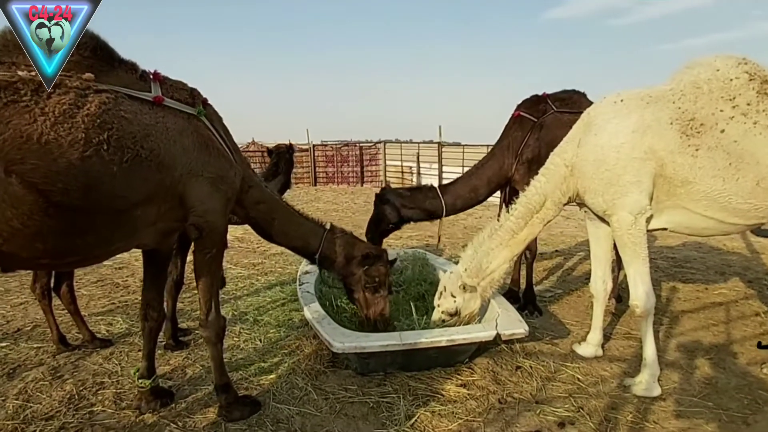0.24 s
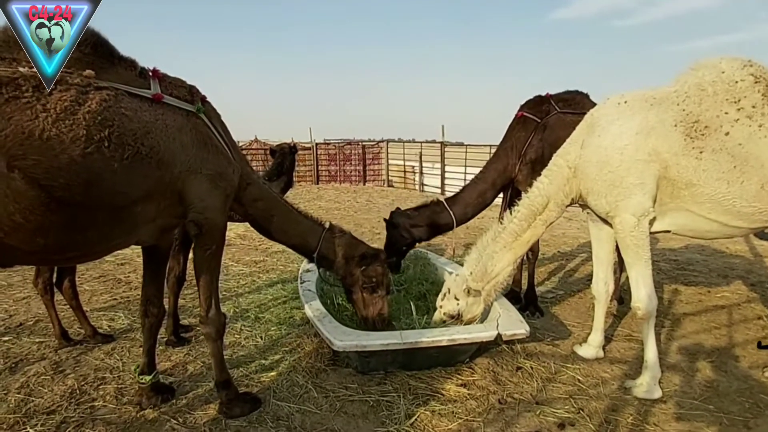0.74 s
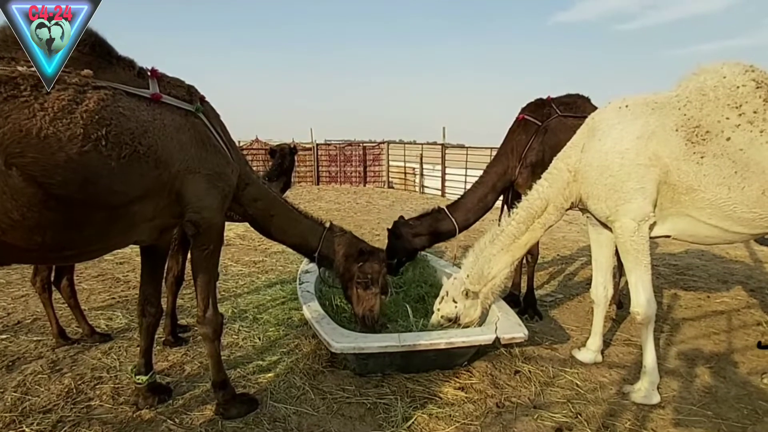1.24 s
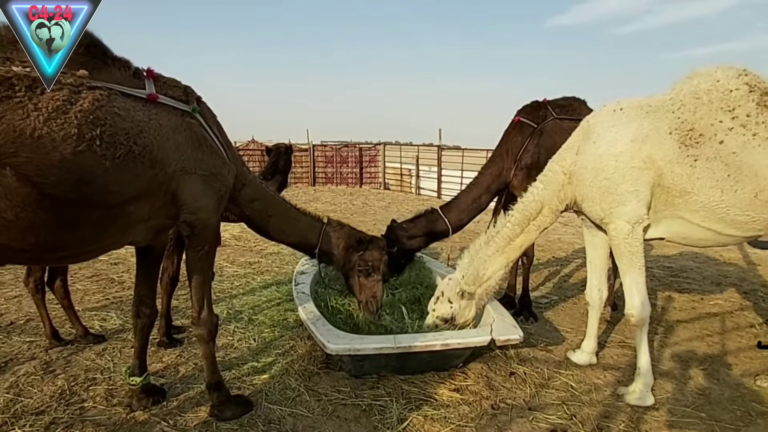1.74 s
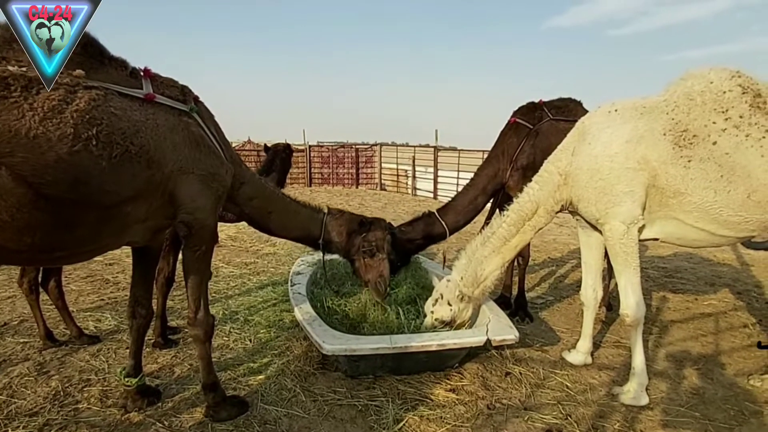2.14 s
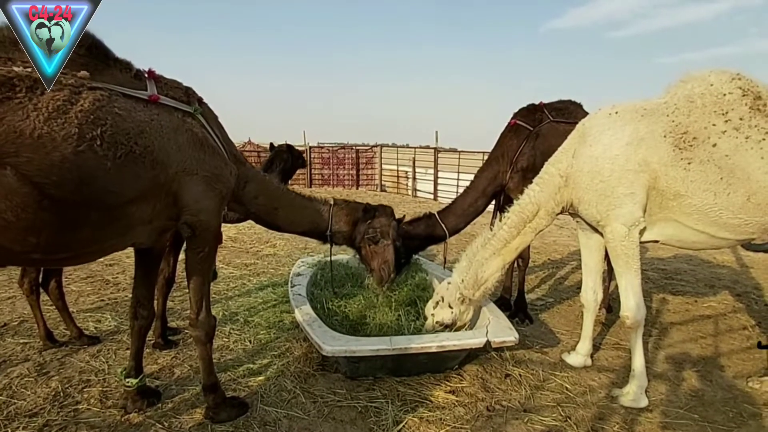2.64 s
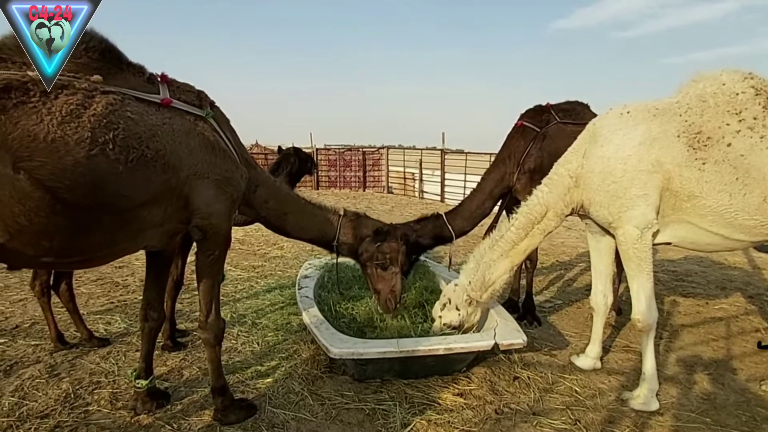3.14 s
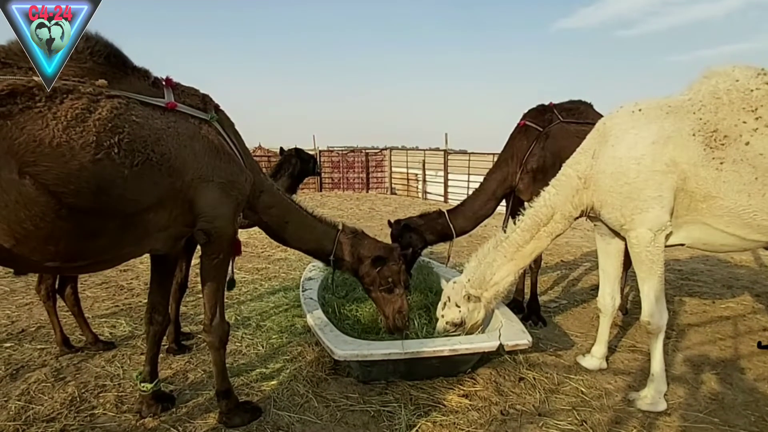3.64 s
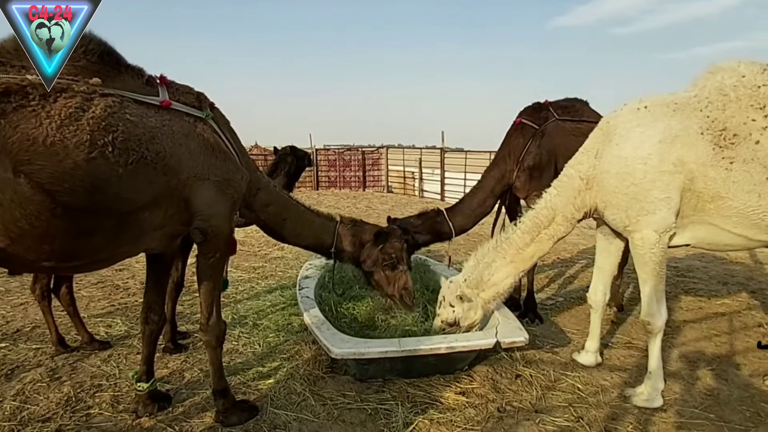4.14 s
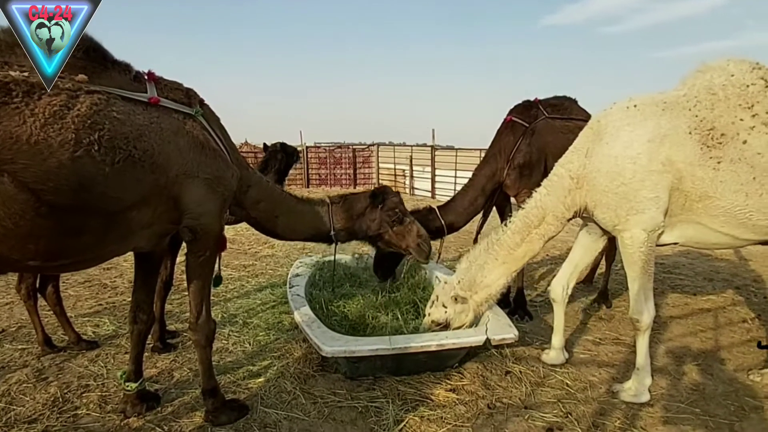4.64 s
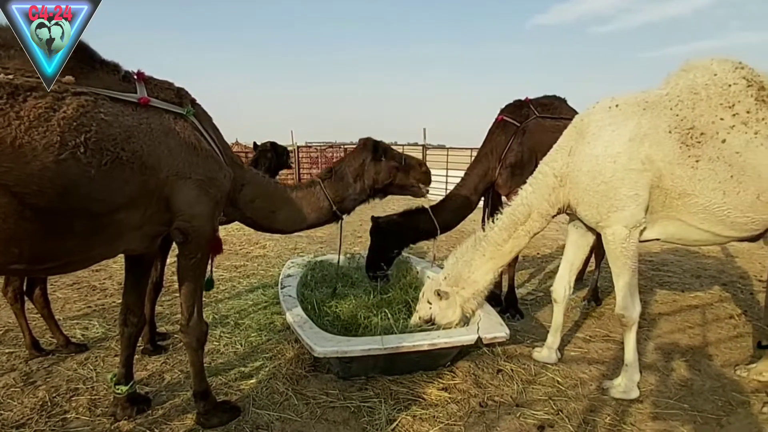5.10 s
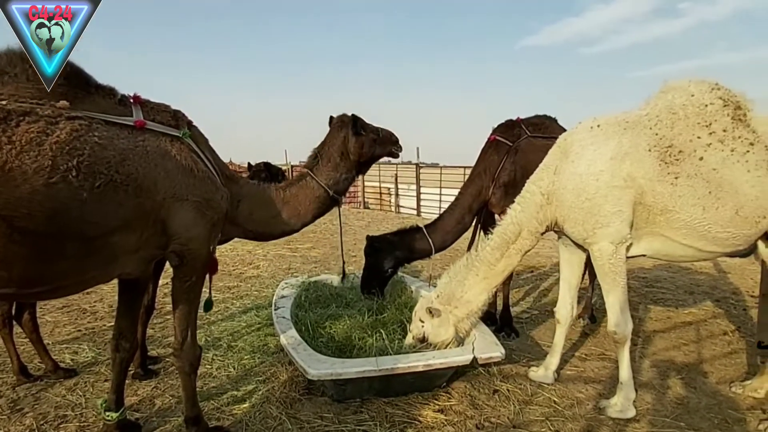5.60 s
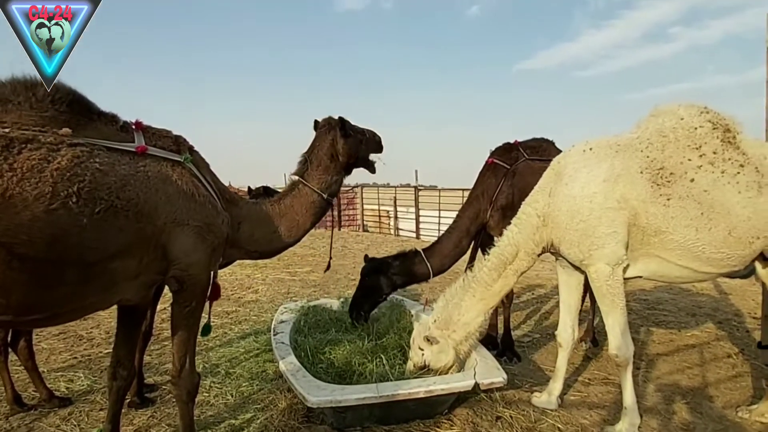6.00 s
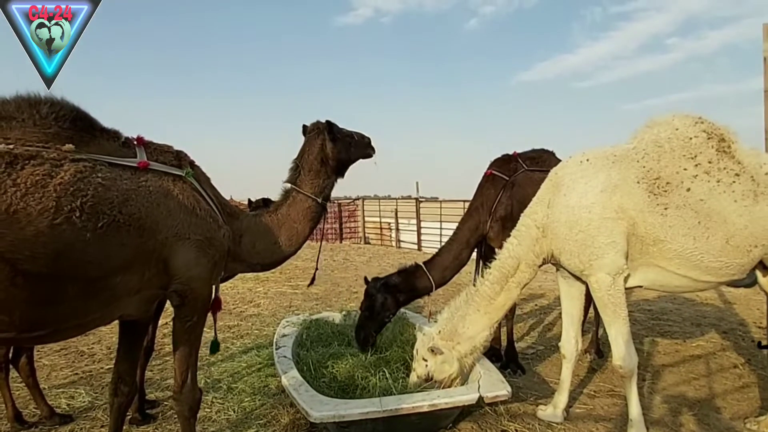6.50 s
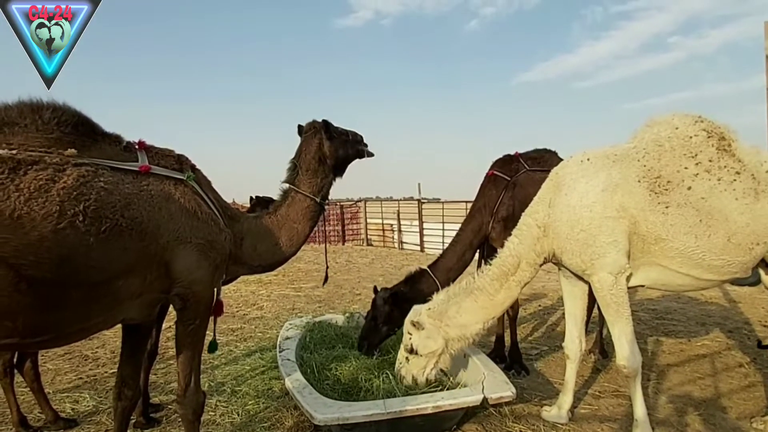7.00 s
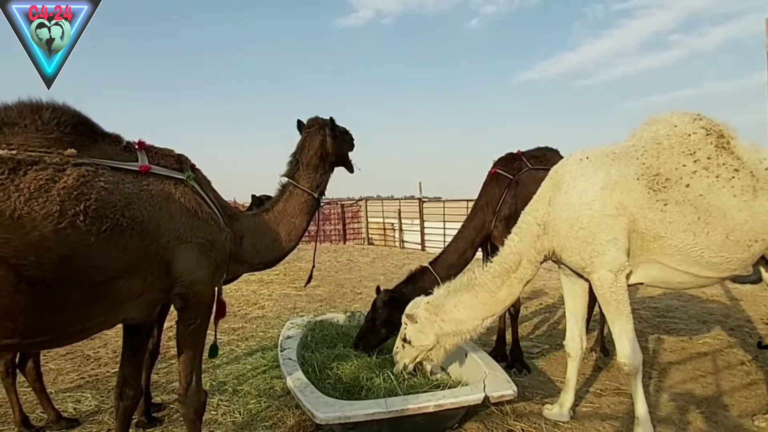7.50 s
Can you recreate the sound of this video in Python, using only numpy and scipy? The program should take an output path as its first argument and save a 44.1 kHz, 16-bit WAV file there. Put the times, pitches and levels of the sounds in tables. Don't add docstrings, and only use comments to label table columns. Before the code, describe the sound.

A hoarse rooster crows twice at some distance through buffeting wind and grass hiss, with fodder rustling and light knocks on a plastic trough.

```python
import sys
import numpy as np
from scipy import signal
from scipy.fft import rfft, irfft, next_fast_len
from scipy.io import wavfile
from scipy.ndimage import uniform_filter1d

SR = 44100
rng = np.random.default_rng(int(sys.argv[2]) if len(sys.argv) > 2 else 0)


def to_wav(s):
    ch = np.atleast_2d(s).T
    pcm = np.round(np.clip(ch, -1, 1) * 32767)
    wavfile.write(sys.argv[1], SR, pcm.astype(np.int16))


def invert_db(level):
    return 10 ** (np.asarray(level, dtype=float) / 20)


N = 341775


def evened(x):
    return x / np.sqrt(np.mean(x ** 2) + 1e-20)


def curve(rows, column):
    rows = np.array(rows)
    return np.interp(np.arange(N) / SR, rows[:, 0], rows[:, column])


def coloured(x, points):
    size = next_fast_len(len(x))
    hz, db = np.transpose(points)
    bins_hz = np.fft.rfftfreq(size, 1 / SR)
    shape_db = np.interp(np.log(bins_hz + 1), np.log(hz), db)
    return evened(irfft(rfft(x, size) * invert_db(shape_db), size)[:len(x)])


def drift(count, hz):
    b, a = signal.butter(2, hz, fs=SR)
    return evened(signal.lfilter(b, a, rng.standard_normal(count + SR))[SR:])


def resonate(x, hz, width):
    r = np.exp(-np.pi * width / SR)
    return 2 * signal.lfilter([1 - r], [1, -r * np.exp(2j * np.pi * hz / SR)], x).real


def add(mix, s, sound):
    part = mix[..., round(s * SR):][..., :sound.shape[-1]]
    part += sound[..., :part.shape[-1]]


def panned(db, pan_db):
    return invert_db(db + pan_db * np.array([[.5], [-.5]]))


def swells(s, hold, db, rise, fall):
    t = np.arange(0, N + 64, 64)[:, None] / SR
    each_db = db - rise * np.maximum(s - t, 0) - fall * np.maximum(t - s - hold, 0)
    total_db = 10 * np.log10((invert_db(each_db) ** 2).sum(1) + 1e-14)
    return np.interp(np.arange(N) / SR, t[:, 0], total_db)


# (t/s, hold/s, flutter level/dB, thud over flutter/dB)
LEFT_GUSTS = [(0.0, 0.045, -49.5, 12.5), (.16, 0.099, -42, -5.5), (.34, 0.23, -45.5, 0.5),
              (.62, 0.019, -42.5, 0), (.8, 0.36, -38, 3), (1.21, 0.14, -32.5, 4), (1.42, 0.079, -43.5, 7),
              (1.6, 0.049, -38, 6), (1.79, 0.02, -33, 1), (1.95, .22, -39, 8), (2.3, 0.063, -49.5, 6),
              (2.62, 0.026, -37, -1), (2.92, 0.016, -33, 1), (3.04, 0.24, -43.5, 4.5),
              (3.25, 0.063, -36, 3), (3.66, 0.016, -53.5, 8.5), (3.82, 0.029, -52, 3.5),
              (4.1, 0.047, -50, 4), (4.33, 0.064, -53, 7.5), (4.49, .12, -36.5, 6.5),
              (4.7, 0.21, -37.5, 1.5), (5.06, 0.32, -52.5, 6.5), (5.46, 0.014, -46.5, 5.5),
              (5.6, 0.055, -37.5, 1.5), (5.78, 0.38, -44.5, 4.5), (6.2, 0.25, -42.5, 4),
              (6.64, 0.01, -49.5, 5.5), (6.86, 0.031, -51, 4.5), (7.13, 0.18, -61, 4.5),
              (3.45, 0.057, -64, 14.5)]
RIGHT_GUSTS = [(0.0, 0.024, -45.5, 6.5), (.14, 0.15, -50.5, 10.5), (.34, 0.19, -68.5, 22.5),
               (0.579, 0.059, -45, 5.5), (0.802, 0.5, -34.5, -21), (1.25, 0.096, -33.5, 3.5),
               (1.42, 0.041, -37.5, -20), (1.601, 0.059, -34, -2), (1.868, 0.031, -35.5, 0.5),
               (1.98, 0.21, -38, 4), (2.35, .06, -68.5, 20.5), (2.62, 0.028, -39.5, 0.5),
               (2.902, 0.081, -35, -15), (3.06, 0.27, -41.5, -40), (3.28, 0.038, -48.5, 12),
               (3.67, 0.012, -61, 17), (4.1, 0.12, -55, 8), (4.465, .01, -38, -8), (4.482, .1, -32.5, -7),
               (4.66, 0.24, -41, -3), (5.2, 0.096, -46, -2.5), (5.4, 0.21, -50.5, -23.5),
               (5.63, 0.014, -32.5, -30), (5.78, 0.11, -39.5, -5.5), (6.05, 0.23, -45.5, -0.5),
               (6.298, 0.015, -33, -4), (6.42, 0.066, -45.5, -1), (6.65, 0.012, -57, 11),
               (6.87, 0.018, -54.5, 8), (7.18, 0.027, -54.5, 8), (3.45, 0.095, -62, 8)]
# (f/Hz, level/dB per Hz)
THUD_COLOUR = [
    [(20, -27), (45, -4.5), (100, 6.5), (150, 0), (220, -12.5), (400, -62.5)],
    [(20, -39.5), (45, 3), (100, -2.5), (150, -4.5), (220, -11), (400, -54.5)],
]
# (f/Hz, level/dB per Hz)
FLUTTER_COLOUR = [
    [(90, -36), (170, -2.5), (300, 1), (400, -3.5), (600, -19.5), (1000, -35.5), (1500, -44.5), (3000, -62)],
    [(90, -58.5), (190, -11.5), (300, 5), (420, 2), (600, -10), (1000, -23.5), (1500, -37), (3000, -48.5)],
]


def wind():
    rise, fall = 223, 184
    still_thud_db, still_flutter_db = -77.5, -77
    out = np.zeros((2, N))
    for port, gusts in enumerate((LEFT_GUSTS, RIGHT_GUSTS)):
        s, hold, db, over_db = np.transpose(gusts)
        thud_gain = invert_db(swells(s, hold, db + over_db, rise, fall)) + invert_db(still_thud_db)
        flutter_gain = invert_db(swells(s, hold, db, rise, fall)) + invert_db(still_flutter_db)
        lumps = drift(N, hz=18.7)
        thud = coloured(rng.standard_normal(N), THUD_COLOUR[port])
        thud = evened(thud * invert_db(5.5 * np.minimum(lumps, 1.8)))
        eddies_db = np.minimum(5.6 * lumps + 4.95 * drift(N, hz=61.0), 11)
        eddies = rng.standard_normal(N) * invert_db(eddies_db)
        out[port] = thud_gain * thud + flutter_gain * coloured(eddies, FLUTTER_COLOUR[port])
    return out


# (t/s, level/dB)
HISS_LEVEL = [(0.0, -61), (0.44, -66.5), (1.02, -59.5), (1.2, -56), (1.85, -58.5), (2.05, -54.5),
              (3.2, -57), (3.65, -62), (4.45, -60), (4.6, -54.5), (5.35, -56.5), (5.49, -58), (5.65, -55.5),
              (6.45, -59.5), (6.62, -65), (7.0, -63.5), (7.44, -68.5), (7.74, -69.5)]
# (f/Hz, level/dB per Hz)
HISS_SPECTRUM = [
    [(300, 7.5), (1000, 3.5), (2000, 2), (3200, -10), (4200, 4), (5300, -7.5), (7000, -0.5), (10500, 4.5),
     (14000, 1.5), (16000, -24)],
    [(300, -1), (1000, -3), (2000, -5.5), (3200, -5), (4000, 0.5), (5500, 1), (7000, 1), (10500, -1),
     (14000, -1), (16000, -8)],
]
# (t/s, level/dB)
GRASS_SWISHES = [(.54, -56), (.9, -62), (1.6, -63), (1.77, -55), (2.34, -67), (3.35, -58.5), (3.88, -60),
                 (4.2, -62), (4.35, -63), (4.8, -57), (5.31, -54), (5.82, -61), (6.45, -56.5), (6.89, -68),
                 (7.2, -60.5), (7.59, -63.5)]


def hiss():
    s, db = np.transpose(GRASS_SWISHES)
    swish_db = swells(s, hold=0.011, db=db, rise=143, fall=143)
    slow_db = curve(HISS_LEVEL, column=1)
    level_db = 20 * np.log10(np.hypot(invert_db(slow_db), invert_db(swish_db))) + 0.82 * drift(N, hz=9.5)
    ports = np.array([coloured(rng.standard_normal(N), colour) for colour in HISS_SPECTRUM])
    edge_hz, yard_hz = 8000, 3300
    body = signal.filtfilt(*signal.butter(2, edge_hz, fs=SR), ports)
    ports = body + invert_db(0.21 * (level_db + 56.0)) * (ports - body)
    hum = signal.filtfilt(*signal.butter(4, yard_hz, fs=SR), ports)
    ports = ports + (invert_db(-0.35 * (level_db + 63.0)) - 1) * hum
    return invert_db(level_db) * invert_db(np.array([[-6.5], [.7]])) * ports


# (t/s, peak level/dB, ring f/Hz, pan/dB)
EDDY_POPS = [(0.135, -32.5, 64.6, -3.0), (0.462, -34.5, 105, 0.5), (0.752, -34.5, 380, 2.0),
             (0.833, -23.5, 433, -5), (0.885, -19, 418, -1.0), (1.234, -34, 61.9, 3.0),
             (1.234, -20, 96.9, 0), (1.343, -25, 132, 1.0), (1.566, -25.5, 304, 1.5),
             (1.759, -28.5, 350, 5), (1.787, -27, 272, 0), (1.885, -22.5, 92, -4.0), (1.974, -29, 312, 0.0),
             (2.094, -28.5, 86.1, -1), (2.239, -33, 61.9, -0.5), (2.345, -39, 94.2, -3.5),
             (2.468, -45, 102, 0), (2.519, -36.5, 149, 7), (2.633, -26.5, 288, -1.0), (2.861, -37, 88.8, 0),
             (2.904, -28.5, 131, 2.0), (3.036, -35, 288, 2.5), (3.165, -28, 291, 1), (3.241, -27.5, 304, 4),
             (3.642, -41, 99.6, -4.5), (3.802, -47, 367, 0.5), (4.083, -42, 118, 0.0),
             (4.331, -37.5, 88.8, -1), (4.55, -21.5, 345, 0), (4.686, -33, 151, -0.5),
             (4.742, -21, 345, -3), (5.148, -39.5, 136, 3.0), (5.33, -42, 296, 1), (5.588, -32.5, 88.8, 2),
             (5.754, -35, 121, -0.5), (6.019, -41, 106, 4.5), (6.093, -28.5, 269, 1),
             (6.227, -33, 358, -3.5), (6.305, -26.5, 132.1, 0.0), (6.555, -42, 334, -3),
             (6.63, -38, 312, -2.0), (6.847, -43, 110, 1.5), (7.141, -53, 151, -3.0),
             (7.199, -39, 132, 1.0), (7.382, -51.5, 428, -0.5)]


def pops():
    out, t = np.zeros((2, N)), np.arange(3000) / SR
    for s, db, hz, pan_db in EDDY_POPS:
        ring = np.sin(2 * np.pi * hz * t) * t ** 2 * np.exp(-t * hz / 0.5)
        add(out, s, panned(db - 3.0, pan_db) * ring / abs(ring).max())
    return out


def throat(hz, centre_hz, width):
    return 1 / (1 + ((hz - centre_hz) / width) ** 2)


# (f/Hz, width/Hz, level/dB)
RASP_MODES = [(720, 200, -2), (1000, 200, -1), (1450, 240, -3), (1850, 320, 0), (2450, 300, -8),
              (3800, 300, -22)]


def rasp_noise(phase):
    puffs = (0.6 + np.cos(phase)) * rng.standard_normal(len(phase))
    puffs = puffs * invert_db(3 * drift(len(phase), hz=60))
    return evened(sum(invert_db(db) * resonate(resonate(puffs, f, w), f, w) for f, w, db in RASP_MODES))


def syllable(rows, depth, third_db, fourth_db, rasp_db, half_db):
    s, *columns = np.transpose(rows)
    t = np.arange(s[0], s[-1], 1 / SR)
    count = len(t)
    hz, effort_db, beak_db = (np.interp(t, s, c) for c in columns)
    from_edge = np.minimum(t - t[0], t[-1] - t)
    rasp_db = np.maximum(rasp_db, -13 - 400 * from_edge)
    flip_s, flip_hold_s, flip_db, flip_db_per_s = 1.966, 0.31, -19.5, 206
    from_flip = np.maximum(np.maximum(flip_s - t, t - flip_s - flip_hold_s), 0)
    half_db = np.maximum(half_db, flip_db - flip_db_per_s * from_flip)

    catch_hz = 31
    catch_phase = 2 * np.pi * np.cumsum(catch_hz * (1 + .004 * drift(count, hz=10))) / SR
    warble = np.exp(5 * (np.cos(catch_phase) - 1))
    warble *= np.clip(.95 + .2 * drift(count, hz=12), 0, 1.5)
    climb = (t - t[0]) * catch_hz % 1 - .5
    wobble = 3.5 * (warble - .07) + 1.6 * uniform_filter1d(climb, size=200)
    wobble = depth * (wobble + .6 * drift(count, hz=70))
    phase = 2 * np.pi * np.cumsum(hz * (1 + wobble)) / SR

    effort = invert_db(effort_db)
    swell = invert_db(-520 * depth * warble)
    beak = invert_db(beak_db)
    tone = (np.sin(phase) + beak * np.sin(2 * phase)) / np.hypot(1, beak)
    third = invert_db(third_db) * throat(3 * hz, centre_hz=2530, width=200) ** 2
    fourth, fifth = (invert_db(fourth_db) * throat(k * hz, centre_hz=3695, width=260) ** 3 for k in (4, 5))
    tone += third * np.sin(3 * phase) + fourth * np.sin(4 * phase) + fifth * np.sin(5 * phase)
    half_lines = invert_db(-6.5) * np.sin(3 * phase / 2) + np.sin(5 * phase / 2)
    half_lines += throat(7 * hz / 2, centre_hz=2470, width=69) * np.sin(7 * phase / 2)
    tone += invert_db(half_db + 3.5 * drift(count, hz=25)) * half_lines
    rasp = uniform_filter1d(effort, size=900) * invert_db(rasp_db) * rasp_noise(phase)
    sound = np.sqrt(2) * swell * effort * tone + rasp
    return sound * signal.windows.tukey(count, min(0.0032 * SR / count, 1))


def murmur(start, length, from_hz, to_hz, db, beak_db):
    rise, fall = min(0.03, length / 3), min(0.043, length / 3)
    sag_db, ends_db = -3.5, -8
    shape = [(0, ends_db), (rise, 0), (length - fall, sag_db), (length, sag_db + ends_db)]
    glide = (to_hz - from_hz) / length
    return [(start + s, from_hz + glide * s, db + under_db, beak_db) for s, under_db in shape]


# (t/s, pitch f/Hz, effort level/dB, beak opening as second partial over first/dB)
FIRST_COCK = [(1.012, 850, -66, 10), (1.033, 850, -42, -7), (1.054, 919, -31, -11), (1.07, 975, -44, -3),
              (1.088, 930, -47, -2), (1.098, 945, -38, -4), (1.114, 895, -31, -18), (1.13, 880, -52, -2),
              (1.17, 680, -52, 4)]
FIRST_DOODLE = [(1.178, 835, -44, -4), (1.21, 850, -34, -10.5), (1.216, 925, -37, -5),
                (1.245, 920.4, -38, -8.5), (1.325, 924, -39, -1.5), (1.355, 908, -32, -1),
                (1.395, 909.3, -31.5, 2), (1.467, 887, -37.5, -10.5), (1.488, 796, -46, -1)]
FIRST_DOO = [(1.572, 792, -40, 0), (1.591, 862.4, -40, -9), (1.715, 851.2, -38, 3.5),
             (1.915, 842.8, -35, 7), (2.135, 837.3, -43, -1), (2.275, 831, -41.5, 8),
             (2.462, 813, -44.5, -1.5), (2.535, 809.3, -40, 7.5), (2.655, 794, -41, 7.5)]
SECOND_DOODLE = [(5.04, 736, -61, 6), (5.07, 795, -41, -7), (5.078, 914, -38, -10), (5.162, 910, -37, -9),
                 (5.2, 955, -35.5, 1), (5.285, 973, -36.5, 0.5), (5.374, 946, -35.5, -0.5),
                 (5.382, 800, -38.5, -5.5), (5.461, 742, -58.5, 15)]
SECOND_DOO = [(5.546, 760, -43, 2), (5.561, 899, -43, -8), (5.702, 875.7, -45.5, 1.5), (5.79, 876, -39, 17),
              (5.93, 879, -41, 10), (6.082, 860.7, -54, -4), (6.172, 846.7, -43, 13.5),
              (6.36, 834.6, -46, 5), (6.492, 813.5, -42.5, -2)]
# (t/s, length/s, from f/Hz, to f/Hz, effort level/dB)
SOFT_MURMURS = [(.735, 0.083, 812, 800, -57.5), (0.818, 0.13, 681, 678, -50.5),
                (1.492, 0.098, 695, 724, -50.5), (2.661, .13, 690, 700, -49), (4.735, 0.08, 692, 705, -54),
                (4.818, 0.115, 700, 729, -49), (5.5, 0.062, 725, 750, -52), (6.486, 0.0686, 782, 830, -51),
                (2.725, 0.094, 858, 769, -50), (2.7, .055, 900, 1000, -52.5)]
SOFT_BEAKS = [14, -8, -6, -8.5, 5, 2, -1, 2, 5, -8]
# (warble/share of pitch, third partial/dB, fourth partial/dB, rasp/dB, half-pitch lines/dB)
CROW_VOICES = [
    (0.02, -13, -40, -13, -30),
    (0.005, -17, -30, -34, -50),
    (0.003, -42, -42, -35, -46),
    (0.024, -14, -19, -14.5, -23),
    (0.0028, -21, -4, -27, -44),
]
SOFT_VOICES = [(0.02, -22, -34, -12, -16), (0.035, -22, -34, -10, -25), (0.01, -10, -36, -16, -4),
               (0.028, -26, -24, -11, -20), (0.022, 25, -30, -8, -29), (0.024, 22, -20, -6, -24),
               (0.012, -22, -16, -9, -24), (0.035, -12, -32, -5, -18), (0.012, -20, -40, -15, -25),
               (0.01, -30, -40, -14, -30)]
# (left t/s, right t/s, left level/dB, right level/dB)
YARD_ECHOES = [(.0071, .0064, -17, -18), (0.018, .0215, -15, -11.5), (.034, .031, -21, -9.5),
               (.055, .06, -15, -16)]


def rooster():
    dry = np.zeros(N)
    calls = [FIRST_COCK, FIRST_DOODLE, FIRST_DOO, SECOND_DOODLE, SECOND_DOO]
    calls += [murmur(*row, beak_db) for row, beak_db in zip(SOFT_MURMURS, SOFT_BEAKS)]
    for rows, voice in zip(calls, CROW_VOICES + SOFT_VOICES):
        add(dry, rows[0][0], syllable(rows, *voice))
    shadow_hz = 1500
    shaded = signal.lfilter(*signal.butter(1, shadow_hz, fs=SR), dry)
    out = np.array([invert_db(-0.5) * np.roll(shaded, -3), invert_db(2.5) * dry])
    for left_s, right_s, left_db, right_db in YARD_ECHOES:
        add(out[0], left_s, invert_db(left_db) * dry)
        add(out[1], right_s, invert_db(right_db) * dry)
    return out


# (t/s, length/s, from f/Hz, to f/Hz, level/dB)
FAINT_WHISTLES = [
    (1.479, 0.089, 4750, 4910, -62),
    (2.842, .035, 4300, 4230, -60.5),
]


def whistles():
    out = np.zeros(N)
    for s, length, from_hz, to_hz, db in FAINT_WHISTLES:
        hz = np.linspace(from_hz, to_hz, round(length * SR))
        whistle = np.sin(2 * np.pi * np.cumsum(hz) / SR)
        add(out, s, invert_db(db) * np.hanning(len(hz)) * whistle)
    return out


# (t/s, peak level/dB, ring f/Hz, bright edge/dB, pan/dB)
TROUGH_KNOCKS = [(2.6384, -42, 1430, -30, -6), (3.042, -54, 1230, 3, -10), (4.197, -75, 1010, 22.5, -9),
                 (4.86, -37, 1400, -8, -3), (6.4407, -34.5, 2150, -7, -9), (6.482, -40.5, 2100, -3.5, -10),
                 (4.838, -41, 2050, -20, -2), (4.892, -44, 2300, -14, -4), (4.926, -49, 2100, -22, -2),
                 (4.953, -49.5, 1350, -20, -2), (7.205, -44, 1400, -20, -2), (7.213, -47, 1200, -25, -2),
                 (7.3886, -53, 1650, -30, -3), (7.5193, -57, 1500, -8, -2)]


def knocks():
    out, t = np.zeros((2, N)), np.arange(2600) / SR
    for s, db, hz, edge_db, pan_db in TROUGH_KNOCKS:
        blow = rng.standard_normal(len(t)) * np.exp(-t / 0.0026) * (1 - np.exp(-t / 0.00041))
        ring = resonate(resonate(blow, hz, width=360), hz, width=1400)
        ring = ring + 1.15 * resonate(blow, 0.5 * hz, width=130)
        edge = resonate(resonate(blow, hz=3700, width=870), hz=3700, width=870)
        sound = ring / abs(ring).max() + invert_db(edge_db) * edge / abs(edge).max()
        add(out, s, panned(db, pan_db) * sound)
    return out


# (t/s, hold/s, level/dB)
FODDER_PULLS = [(3.05, 0.024, -66.5), (4.72, .01, -60), (4.836, .06, -57), (6.436, 0.016, -55.5),
                (6.516, 0.055, -87), (7.14, .05, -66.5), (7.193, 0.041, -59), (7.27, 0.04, -68.5),
                (7.452, 0.12, -67), (7.66, 0.081, -84.5)]
# (f/Hz, level/dB per Hz)
TROUGH_COLOUR = [(300, -20), (930, -9), (1080, 0), (1230, -12), (2400, -19), (3200, -28), (4300, -22),
                 (6500, -34)]


def fodder():
    clumps = invert_db(4 * drift(N, hz=50))
    shared = rng.standard_normal(N)
    snaps = [coloured(clumps * (shared + 1.46 * rng.standard_normal(N)), TROUGH_COLOUR)
             for port in range(2)]
    s, hold, db = np.transpose(FODDER_PULLS)
    return invert_db(swells(s, hold, db, rise=303, fall=242) + 3.5) * np.array(snaps)


# (t/s, peak level/dB, ring f/Hz, pan/dB)
STALK_TAPS = [(7.107, -62, 1170, -2.0), (7.132, -57, 980, -1.5), (7.152, -53, 859, -1.0),
              (7.171, -50, 719, -2.0), (7.205, -41, 842, -1.5), (7.231, -47, 1020, -1.0),
              (7.341, -59, 1050, -3.5), (7.352, -56, 993, -3.0), (7.388, -50, 1390, -3.0),
              (7.452, -56, 1010, 1.0), (7.464, -55, 1190, -1.5), (7.491, -51, 961, -1.0),
              (7.519, -51, 1010, -1.0), (7.595, -63, 1060, 0.0)]


def taps():
    out, t = np.zeros((2, N)), np.arange(2600) / SR
    for s, db, hz, pan_db in STALK_TAPS:
        tick = rng.standard_normal(len(t)) * np.exp(-t / 0.003)
        ring = resonate(resonate(tick, hz, width=110), hz, width=700)
        add(out, s, panned(db, pan_db) * ring / abs(ring).max())
    return out


def scene():
    return wind() + hiss() + pops() + rooster() + whistles() + knocks() + fodder() + taps()


def band_limit(x):
    return signal.sosfilt(signal.butter(12, 14580, fs=SR, output="sos"), x)


def record(dry):
    return band_limit(dry)


dry = scene()
out = record(dry)
to_wav(out)
```